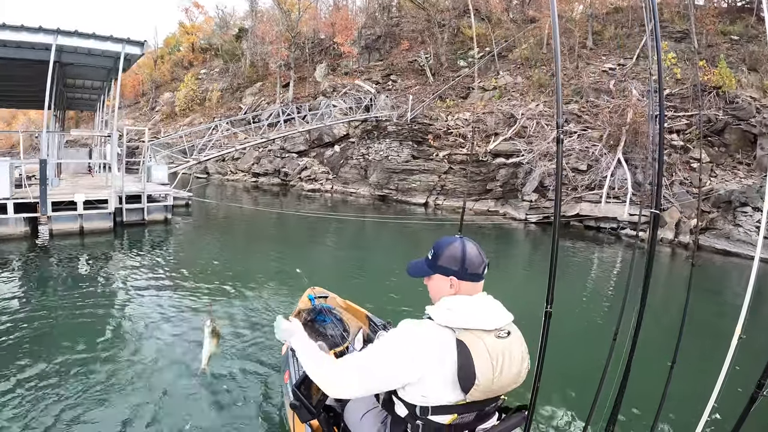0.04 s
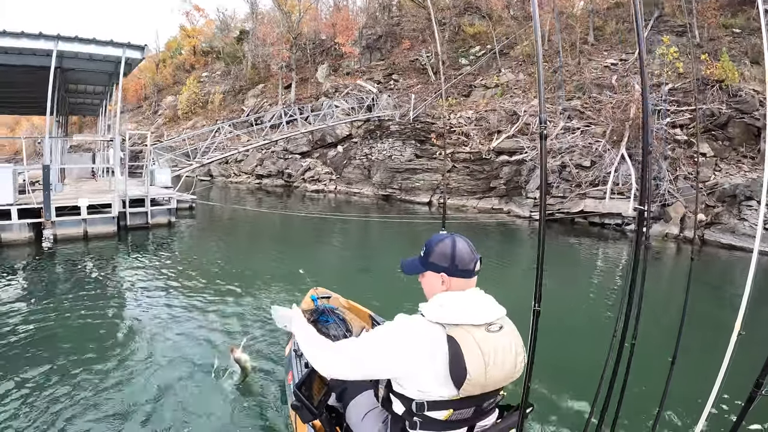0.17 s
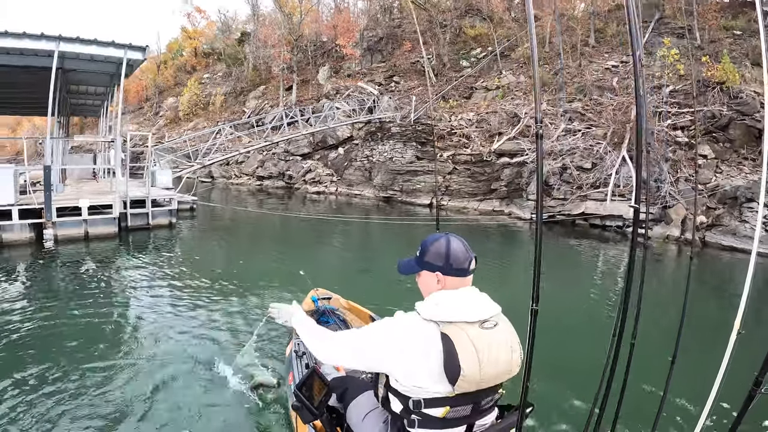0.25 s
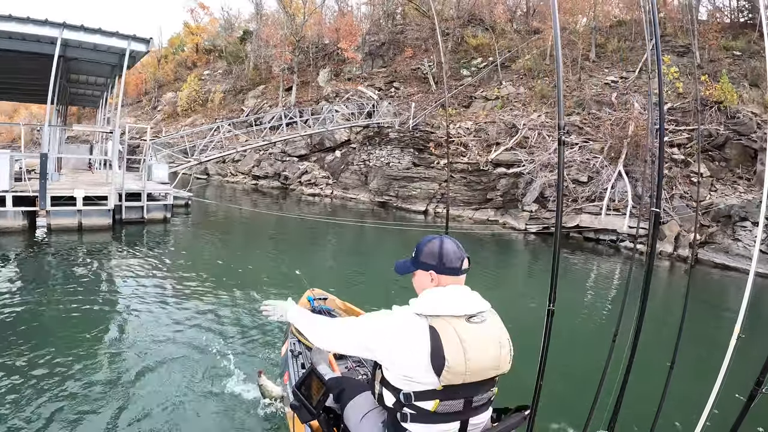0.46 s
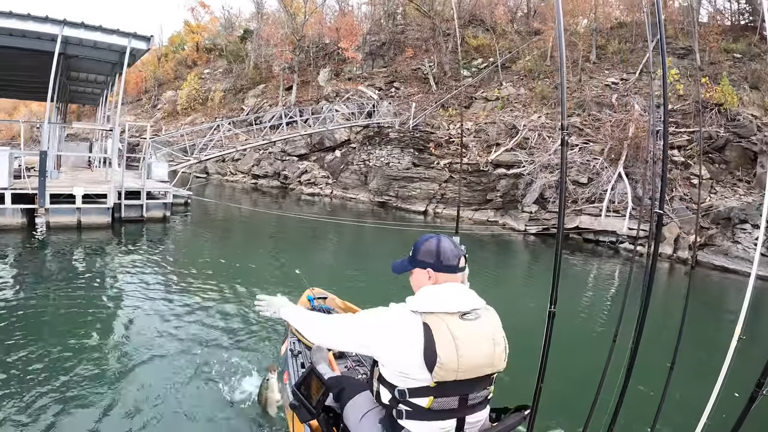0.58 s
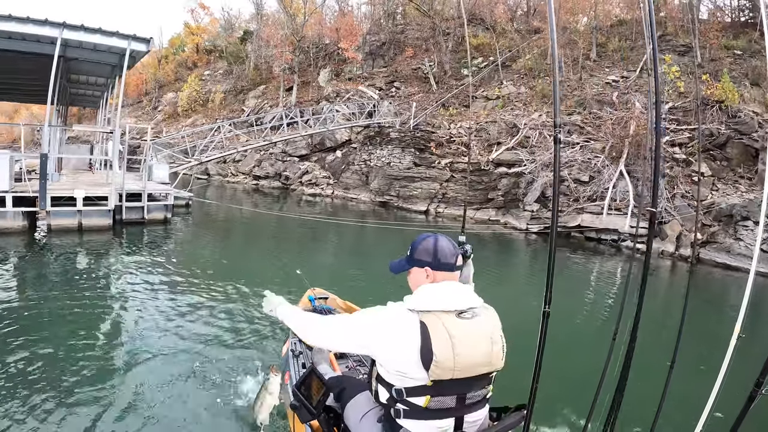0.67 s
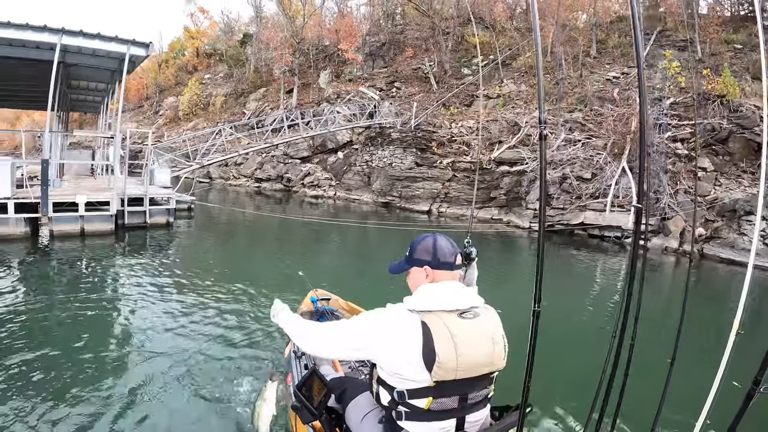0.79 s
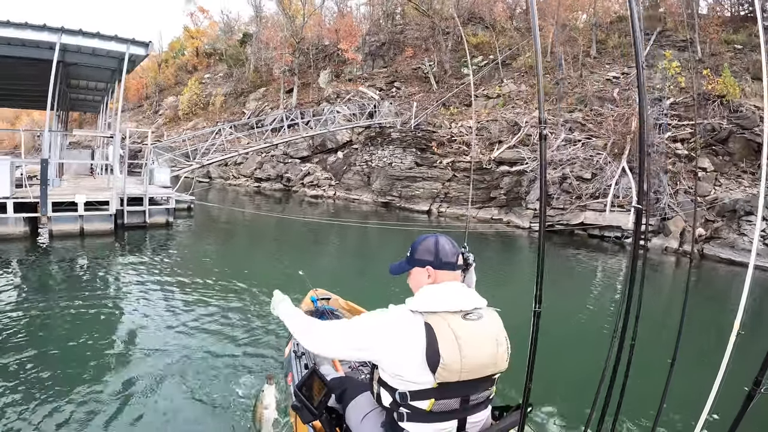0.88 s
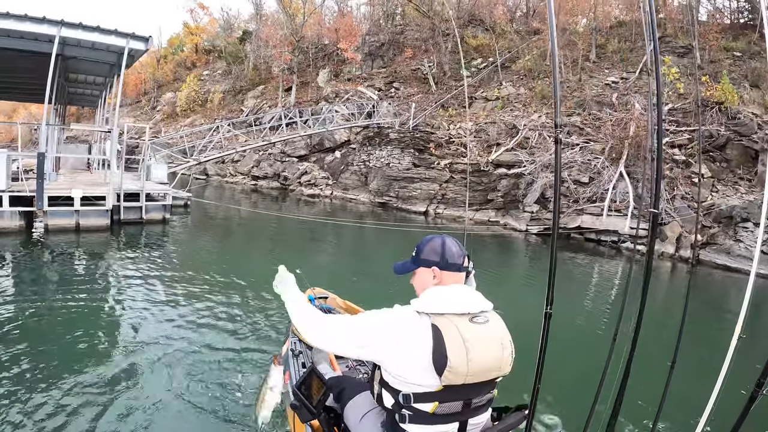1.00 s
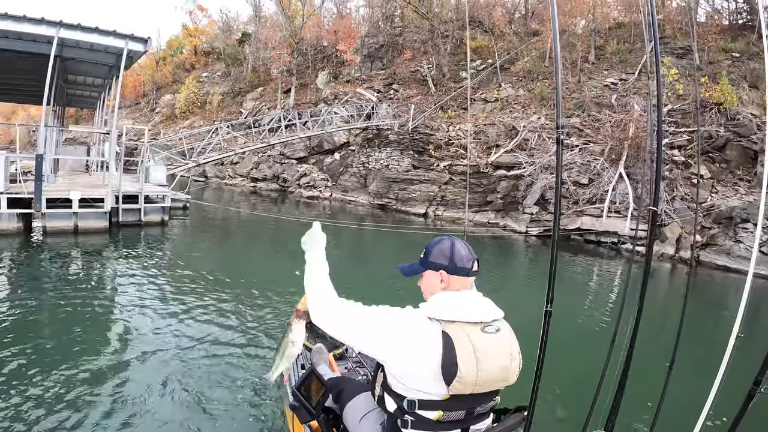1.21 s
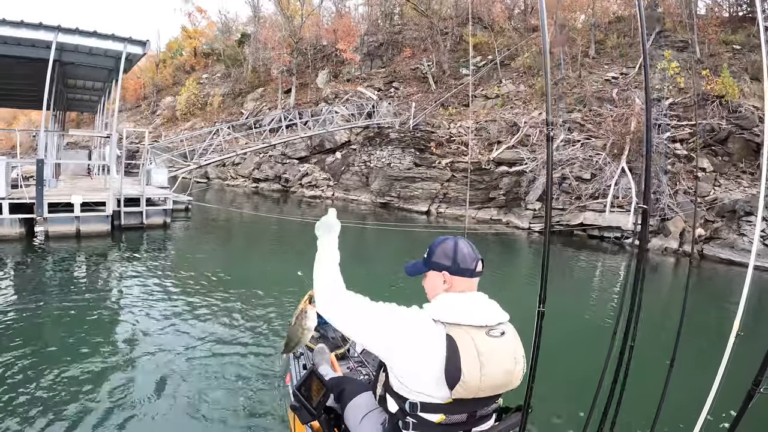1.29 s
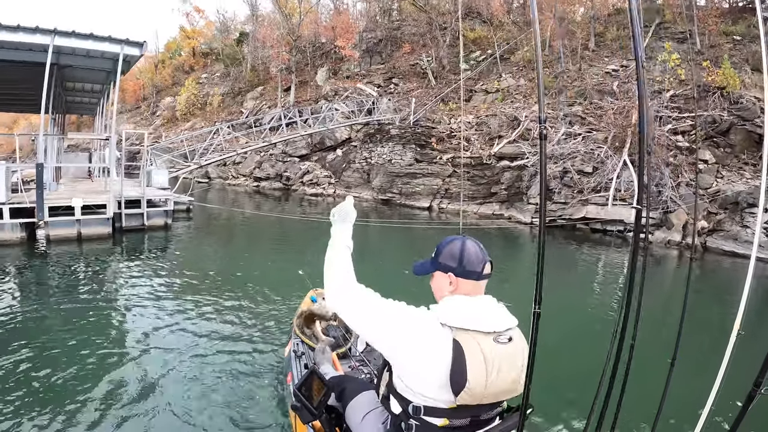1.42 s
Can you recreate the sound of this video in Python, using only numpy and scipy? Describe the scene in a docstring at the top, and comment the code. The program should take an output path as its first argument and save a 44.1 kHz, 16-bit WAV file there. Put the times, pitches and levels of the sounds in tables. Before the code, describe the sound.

Close, lively splashing as a fish struggles at the surface of open water. Plops and spray surround a deep thump against the boat, then the water settles into light dripping and a few faint knocks.

```python
"""A hooked fish thrashes at the surface beside a kayak. Its tail slaps the water and traps pockets
of air that ring, and one heavy plunge booms through the hull. Spray falls back as bubbles and ticks,
the fish drips as it is lifted, and gear knocks softly in the boat.
All around is open water, with a faint echo from the rocky bank."""
import sys
import numpy as np
from scipy import signal
from scipy.fft import rfft, irfft, next_fast_len
from scipy.io import wavfile
from scipy.ndimage import map_coordinates

SR = 44100
rng = np.random.default_rng(int(sys.argv[2]) if len(sys.argv) > 2 else 0)


def waveform_to_disk(signal):
    """Save audio, clipped to [-1, 1], as 16-bit WAV at the path in sys.argv[1]."""
    frames = np.transpose(np.atleast_2d(signal))
    scaled = np.clip(frames, -1, 1) * 32767
    samples = np.round(scaled).astype(np.int16)
    wavfile.write(sys.argv[1], SR, samples)


N = 63945  # samples: 1.45 s


def amp(db):
    """Turn decibels into a gain."""
    return 10 ** (np.asarray(db) / 20)


def unit(x):
    """Scale a sound to an average (rms) strength of 1."""
    return x / np.sqrt(np.mean(x ** 2) + 1e-20)


def along(points, hz):
    """Read between (frequency, value) points on a log frequency axis."""
    freqs, values = np.transpose(points)
    return np.interp(np.log(hz + 1), np.log(freqs + 1), values)


def level(rows):
    """Turn (time, level) points into a gain for every sample."""
    times, db = np.transpose(rows)
    return amp(np.interp(np.arange(N) / SR, times, db))


def filtered(x, response):
    """Multiply each frequency in a sound by response(hz)."""
    size = next_fast_len(N + SR // 2)
    return irfft(rfft(x, size) * response(np.fft.rfftfreq(size, 1 / SR)), size)[..., :N]


def coloured(x, colour):
    """Shape a sound's tone with (frequency, level) points, at strength 1."""
    return unit(filtered(x, lambda hz: amp(along(colour, hz))))


def fade(t, t60):
    """Die away by 60 dB in t60 seconds, the fade time."""
    return np.exp(-np.log(1000) * t / t60)


def add(track, start, sound):
    """Mix a sound into the track at a start time in seconds."""
    part = track[round(start * SR):][:len(sound)]
    part += sound[:len(part)]


def grains(count, centre_hz, octaves, cycles, scatter_db, rise):
    """A cloud of tiny bubble tones, each rising in pitch as it fades."""
    start, pitch, size, life = rng.random((count, 4)).T[:, :, None]
    hz = centre_hz * 2 ** (octaves * (2 * pitch - 1))
    t = np.arange(SR // 30) / SR
    t60 = cycles / hz * (.5 + life)
    gain = amp(scatter_db * np.minimum(-np.log(size), np.log(40)))  # a few are much louder
    glide = 1 + rise * np.minimum(t / t60, 1) / 2
    tones = gain * fade(t, t60) * np.sin(2 * np.pi * hz * t * glide)
    at = (start * N).astype(int) + np.arange(len(t))
    return unit(np.bincount(at.ravel(), tones.ravel(), N)[:N])


def froth(cloud, colour, noise_db):
    """Blend bubble tones with hiss and shape their tone."""
    return coloured(cloud + amp(noise_db) * rng.standard_normal(N), colour)


def air():
    """Open air makes a quiet, steady hush."""
    # tone of the air (frequency [Hz], level [dB])
    colour = [(4, -29), (20, 7.5), (100, -8.5), (200, -0.5), (350, -14.5), (700, -30), (1300, -17),
              (3000, -28.5), (7000, -19.5), (10000, -26.5), (15000, -40)]
    return amp(-59.5) * coloured(rng.standard_normal(N), colour)


def surge():
    """Water pushed aside makes a low rumble."""
    # swell of the rumble (time [s], level [dB])
    loudness = [(0, -60), (.24, -65), (.29, -60), (.35, -38.5), (.40, -54), (.5, -35.5), (.6, -45),
                (.71, -43), (.77, -49), (.9, -61.5), (1.22, -61), (1.33, -54), (1.45, -43)]
    # its tone (frequency [Hz], level [dB])
    colour = [(4, -44), (15, -1.5), (30, 2.5), (60, -3.5), (120, -8.5), (200, -12.5), (350, -39),
              (1500, -84)]
    return level(loudness) * coloured(rng.standard_normal(N), colour)


def spray():
    """Fine spray falls back as ticks and longer-ringing droplets."""
    # showers of spray (time [s], level [dB])
    loudness = [(0, -80), (.06, -70), (.105, -56), (.145, -49), (.19, -50.5), (.225, -36), (.258, -46),
                (.298, -35.5), (.318, -38), (.365, -33.5), (.392, -48.5), (.43, -36), (.475, -43),
                (.53, -46), (.6, -47.5), (.68, -47.5), (.75, -46), (.8, -59.5), (.89, -60.5), (.96, -56),
                (1.05, -71.5), (1.38, -71.5), (1.45, -63)]
    # their tone (frequency [Hz], level [dB])
    colour = [(1200, -9), (2800, -2), (4200, -2), (5500, 0.5), (7500, 1), (9000, -6), (11000, -5.5),
              (13500, -16.5), (16000, -48)]
    ticks = grains(count=2600, centre_hz=6520, octaves=1.265, cycles=15.4, scatter_db=4.5, rise=0.067)
    droplets = grains(count=450, centre_hz=5290, octaves=1.0, cycles=36, scatter_db=3.5, rise=.1)
    return level(loudness) * froth(ticks + amp(-2) * droplets, colour, noise_db=-1.5)


def bubbles():
    """Thrown water leaves small bubbles that ring and fizz."""
    # bursts of bubbles (time [s], level [dB])
    loudness = [(0, -62), (.06, -70.5), (.11, -53.5), (.135, -77), (.18, -48), (.225, -32.5), (.26, -41.5),
                (.275, -32), (.298, -47.5), (.32, -34.5), (.37, -32.5), (.395, -40.5), (.46, -36),
                (.52, -38), (.59, -40), (.665, -37.5), (.72, -44), (.785, -54), (.865, -52), (.895, -61.5),
                (.945, -55), (1.05, -70.5), (1.3, -72), (1.45, -60)]
    # their tone (frequency [Hz], level [dB])
    colour = [(400, -9), (800, -5.5), (1150, 2.5), (1800, 3), (2700, -1), (4000, -3.5), (8000, -27)]
    cloud = grains(count=1100, centre_hz=1566, octaves=1.114, cycles=20, scatter_db=2.5, rise=0.12)
    return level(loudness) * froth(cloud, colour, noise_db=0)


def churn():
    """Churning water burbles with low bubble tones."""
    # swell of the churning (time [s], level [dB])
    loudness = [(0, -62), (.15, -81), (.172, -62), (.195, -50), (.212, -50), (.275, -36.5), (.3, -43),
                (.335, -36), (.41, -42.5), (.47, -37.5), (.52, -45.5), (.65, -62), (.8, -61), (.92, -78),
                (1.1, -99), (1.24, -66.5), (1.45, -63)]
    # its tone (frequency [Hz], level [dB])
    colour = [(80, -0.5), (220, -2.5), (380, -2), (600, 2), (800, -1), (1500, -35), (4000, -70)]
    cloud = grains(count=600, centre_hz=421.5, octaves=0.87, cycles=9.8, scatter_db=2.5, rise=0.19)
    return level(loudness) * froth(cloud, colour, noise_db=-40)


def slaps():
    """Each slap snaps, then tears the surface into crackling droplets; the last burst is a rustle."""
    # tail slaps, sharp drop hits and a faint closing rustle
    # (time [s], level [dB], fade time [s], treble limit [Hz])
    bursts = [(0.034, -49, 0.0048, 14000), (0.0658, -46, 0.0066, 8000), (.082, -37.5, 0.0094, 11100),
              (0.1209, -27, 0.005, 6100), (0.1569, -26, 0.0071, 10200), (0.1587, -27, 0.03, 8300),
              (.2032, -38, 0.024, 9000), (0.206, -24.5, 0.019, 8950), (0.2308, -23, 0.018, 14000),
              (.2680, -23.5, 0.015, 14100), (0.288, -26, 0.011, 15000), (.3070, -18.5, 0.018, 12100),
              (.3095, -31, 0.071, 9000), (0.3577, -25, 0.011, 13000), (0.3596, -26.5, 0.024, 10100),
              (0.3668, -24, 0.013, 7850), (.4310, -25, 0.038, 8000), (0.4584, -24, 0.022, 8700),
              (0.473, -22, 0.026, 7700), (0.51, -30, 0.0068, 8000), (0.5195, -35, .01, 13100),
              (0.574, -30.5, 0.01, 8950), (0.5955, -25, 0.0095, 9000), (0.613, -28, 0.015, 8000),
              (0.6876, -26, 0.014, 4850), (0.7312, -30.5, 0.01, 9900), (0.7466, -30.5, 0.011, 6900),
              (.7670, -32, 0.016, 8040), (0.804, -37.5, 0.015, 9000), (0.823, -37.5, 0.021, 10000),
              (.8320, -27.5, 0.019, 5950), (0.8514, -42, .008, 8000), (0.8756, -38.5, 0.014, 7000),
              (.9018, -36, 0.01, 9600), (0.9682, -45.5, 0.042, 7000), (1.1307, -41.5, 0.0074, 8100),
              (1.438, -49.5, 0.092, 15000)]
    # tone of the burst (frequency [Hz], level [dB])
    burst_colour = [(100, -27), (500, -26), (1000, -2.5), (1600, -5.5), (3000, 1.5), (4500, 0.5),
                    (7500, 5.5), (10000, -1.5), (13000, -1), (16000, -37)]
    # tone of the opening snap (frequency [Hz], level [dB])
    snap_colour = [(1500, -25), (3500, -8.5), (7500, -3), (11000, -6.5), (13500, -11), (16000, -24)]
    attack_s, snap_fade_s = 0.0007, 0.0037
    crackle = grains(count=3000, centre_hz=4310, octaves=1.333, cycles=21, scatter_db=3.0, rise=0.064)
    texture = froth(amp(4) * crackle, burst_colour, noise_db=1)
    snap = amp(-2.5) * coloured(rng.standard_normal(N), snap_colour)
    out, t = np.zeros(N), np.arange(SR // 8) / SR
    for start, db, t60, top_hz in bursts:
        at = (round(start * SR) + np.arange(len(t))) % N
        burst = texture[at] * fade(t, t60) * (1 - np.exp(-t / attack_s))
        burst += snap[at] * fade(t, snap_fade_s)
        treble_cut = signal.butter(3, top_hz, fs=SR)
        add(out, start, amp(db) * signal.lfilter(*treble_cut, burst))
    return out


def pockets():
    """Each trapped air pocket rings briefly and unsteadily, rising a little in pitch."""
    # air pockets and plopping drops (time [s], starting pitch [Hz], level [dB], fade time [s])
    plops = [(.1212, 3690, -30, 0.012), (0.143, 2270, -38.5, 0.038), (.1598, 1813, -25, 0.042),
             (0.1601, 2183, -20, 0.027), (.163, 517, -37, .07), (0.207, 538, -23, 0.028),
             (0.253, 310, -31.5, 0.061), (.176, 1330, -30.5, .025), (0.2028, 1149, -18, 0.037),
             (0.2075, 1067, -18.5, 0.029), (.222, 2900, -31, .012), (.2355, 587, -18, 0.03),
             (.247, 2130, -33.5, 0.054), (.268, 1980, -20, 0.013), (.2695, 513, -25, 0.066),
             (0.308, 1612, -22, 0.044), (0.317, 1730, -17.5, 0.014), (.3383, 2450, -18, 0.011),
             (.361, 935, -16.5, .03), (0.3643, 2350, -8.5, 0.011), (.428, 316, -14, 0.048),
             (.441, 275, -15.5, 0.043), (0.4552, 1130, -24, 0.033), (.4595, 1710, -21.5, 0.021),
             (0.46, 334, -24, 0.037), (.467, 294, -14, 0.031), (.472, 2790, -28, 0.014),
             (.476, 1670, -28, .02), (0.48, 1190, -27, 0.02), (.508, 960, -26, 0.018),
             (0.549, 1620, -29.5, 0.028), (0.6878, 2435, -25.5, 0.017), (0.746, 1380, -32.5, 0.035),
             (.8240, 2620, -35.5, 0.017), (.8270, 1546, -26.5, 0.034), (0.8304, 2046, -21, 0.02),
             (0.8295, 1313, -22, 0.033), (0.8725, 1345, -28, 0.028), (.876, 4230, -38, 0.017),
             (.906, 760, -49.5, 0.063), (0.9436, 3200, -42.5, 0.056), (.851, 7000, -40, .008),
             (.8915, 3900, -45, 0.04), (.967, 4900, -37.5, 0.017), (1.073, 1570, -50, 0.034),
             (1.1311, 1120, -47.5, 0.083)]
    rise, attack_cycles, wander_radians = 0.052, 0.76, .55
    out, t = np.zeros(N), np.arange(SR // 8) / SR
    for start, hz, db, t60 in plops:
        cycles = hz * t * (1 + rise * np.minimum(t / t60, 1) / 2)
        wander = wander_radians * map_coordinates(rng.standard_normal(size=600), [cycles / 3])
        swell = 1 - np.exp(-(cycles / attack_cycles) ** 2)
        add(out, start, amp(db) * swell * fade(t, t60) * np.sin(2 * np.pi * cycles + wander))
    return out


def gurgle():
    """As the fish digs in, it opens a growing hollow of air whose rough ring slides down."""
    # ring of the hollow (time [s], pitch [Hz], level [dB])
    slide = [(.168, 1488, -47), (.205, 1010, -45.5), (.238, 556.4, -42), (.262, 297, -38.5),
             (0.284, 190, -37.5), (.32, 149, -57)]
    flutters_per_cycle = 0.35
    times, pitch, db = np.transpose(slide)
    t = np.arange(N) / SR
    cycles = np.cumsum(np.interp(t, times, pitch)) / SR
    flutter = map_coordinates(rng.standard_normal(N // 20), [cycles * flutters_per_cycle])
    on_off = np.clip((t - times[0]) / .005, 0, 1) * np.clip((times[-1] - t) / .01, 0, 1)
    return on_off * amp(np.interp(t, times, db)) * unit(flutter * np.sin(2 * np.pi * cycles))


def hull():
    """A plunge beside the boat sets the hull booming; a slower push favours its low notes."""
    # plunges against the hull (time [s], level [dB], contact time [s])
    plunges = [(0.3615, -10.5, 0.001), (0.452, -24, 0.0013)]
    # the hull's own notes (pitch [Hz], relative level [dB], fade time [s], build-up time [s])
    notes = [(70.5, 14.5, 0.15, 0.039), (69.9, -7, 0.56, 0.056), (116.8, 4, 0.086, 0.0033),
             (180.5, -1, 0.13, 0.00065), (269, -8.5, 0.092, 0.00049), (348, -2.5, 0.064, 0.00077)]
    out, t = np.zeros(N), np.arange(SR) / SR
    for start, db, contact in plunges:
        for hz, note_db, t60, build in notes:
            gain = amp(db + note_db) / (1 + (hz * contact) ** 2)
            swell = (1 - np.exp(-t / build)) ** 2
            add(out, start, gain * swell * fade(t, t60) * np.sin(2 * np.pi * hz * t))
    return out


def knocks():
    """Gear bumps in the boat with short, dull knocks."""
    # bumps of the gear (time [s], level [dB], fade time [s])
    bumps = [(.8055, -36, 0.019), (1.146, -47.5, 0.046), (1.2270, -46.5, 0.033), (1.263, -52, 0.055),
             (1.308, -42.5, 0.018), (1.3245, -45, 0.039), (1.381, -49, 0.034), (1.4189, -45.5, 0.037),
             (1.435, -53, 0.045)]
    # their tone (frequency [Hz], level [dB])
    colour = [(60, -3), (300, 2.5), (750, -3.5), (1300, -9), (2300, -7), (4000, -25.5), (9000, -19.5),
              (15000, -41)]
    attack_s = 0.00062
    loudness, t = np.zeros(N), np.arange(SR // 8) / SR
    for start, db, t60 in bumps:
        add(loudness, start, amp(db) * fade(t, t60) * (1 - np.exp(-t / attack_s)))
    return loudness * coloured(rng.standard_normal(N), colour)


def bank_echo(x, t60):
    """The rocky bank sends the sound back as a blurred, fading tail."""
    t = np.arange(SR // 2) / SR
    tail = rng.standard_normal(len(t)) * fade(t, t60)
    return signal.fftconvolve(x, tail / np.linalg.norm(tail))[:N]


def scattered(x):
    """Hull and water scatter the sound, so each pitch reaches the ears slightly out of step."""
    # strength of the scattering (frequency [Hz], level [dB])
    width = [(30, -11), (70, -17), (200, -17), (2000, -17.5), (8000, -16), (14000, -11)]
    spacing_hz = 22
    ripple = lambda hz: unit(map_coordinates(rng.standard_normal(N // 20), [hz / spacing_hz]))
    return filtered(x, lambda hz: 1j * ripple(hz) * amp(along(width, hz)))  # 1j: a quarter-cycle shift


def scene():
    """The splash lies a little to the left and echoes faintly; the boat sounds close, with no echo."""
    # stereo spread of the air (frequency [Hz], level [dB])
    air_width = [(60, -24), (400, 3.5), (1500, -1.5), (7000, -19), (14000, -12)]
    # balance between the ears (frequency [Hz], left minus right [dB])
    balance = [(60, -4.5), (110, -2.5), (200, -0.5), (380, -0.5), (700, 0.0), (1290, 0.5), (2370, 1.0),
               (4380, 1.0), (8080, 3.5), (14900, 4.0)]
    splash = slaps() + pockets() + gurgle()
    splash += amp(1) * spray() + amp(-0.5) * bubbles() + amp(0.5) * churn()
    near = splash + hull() + knocks()
    # both ears share mid; side is added on the left and taken away on the right
    mid = near + amp(-17.5) * bank_echo(splash, t60=0.34) + surge() + air()
    side = scattered(near) + amp(-10) * surge()
    side += filtered(air(), lambda hz: amp(along(air_width, hz)))
    ears = np.array([mid + side, mid - side])
    return filtered(ears, lambda hz: amp(np.outer([.5, -.5], along(balance, hz))))


def record(dry):
    """Cut off the very highest treble."""
    return filtered(dry, lambda hz: hz < 15100)


dry = scene()
out = record(dry)
waveform_to_disk(out)
```